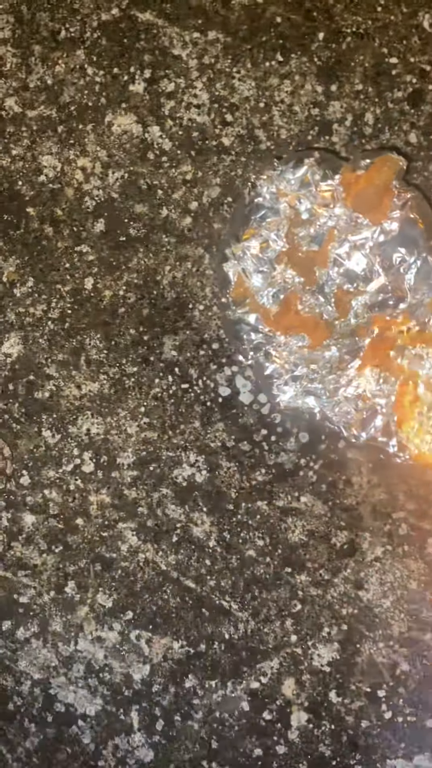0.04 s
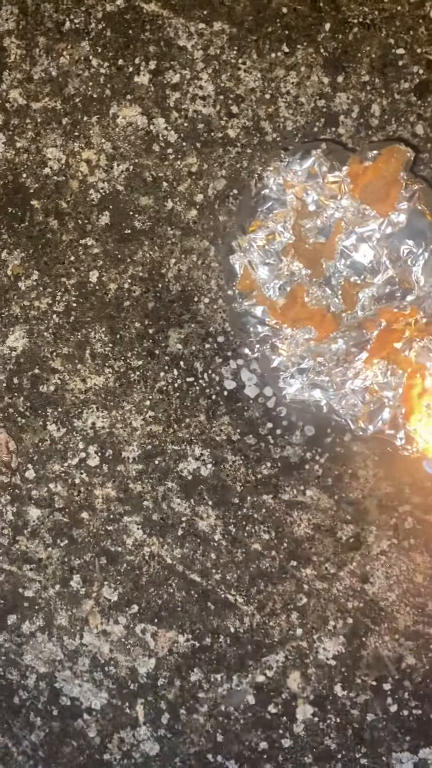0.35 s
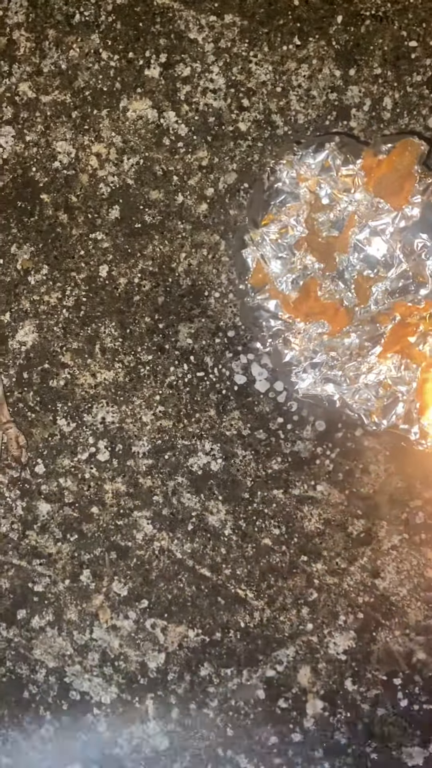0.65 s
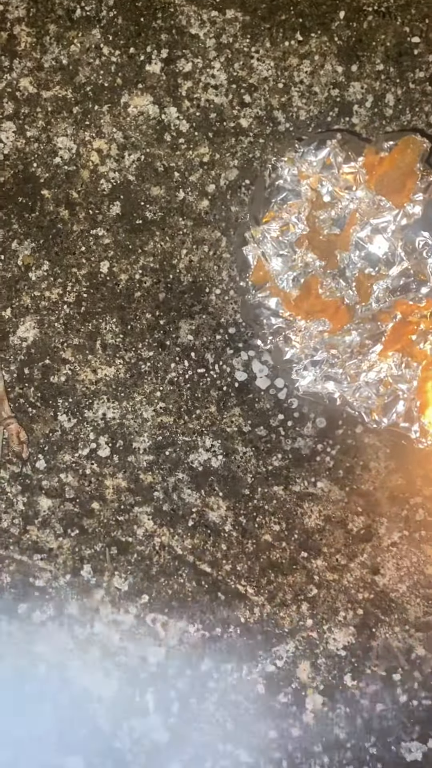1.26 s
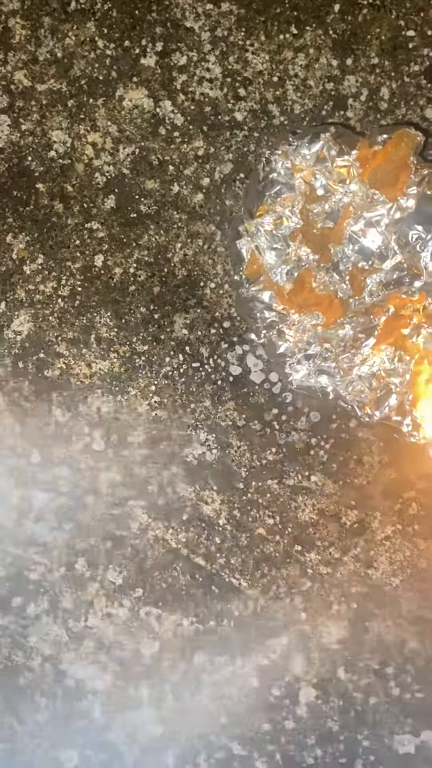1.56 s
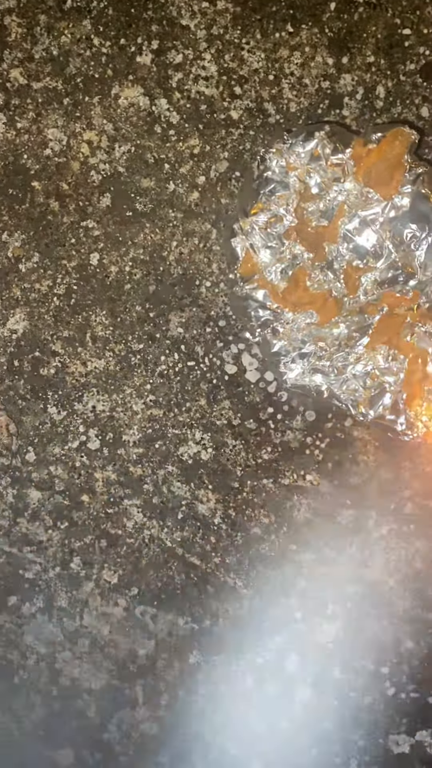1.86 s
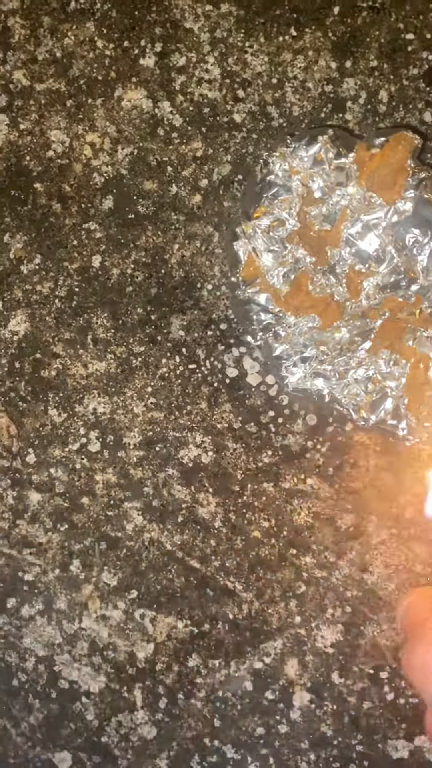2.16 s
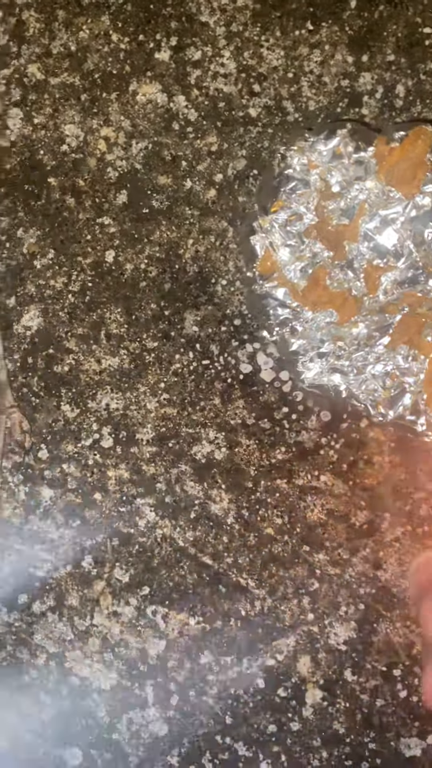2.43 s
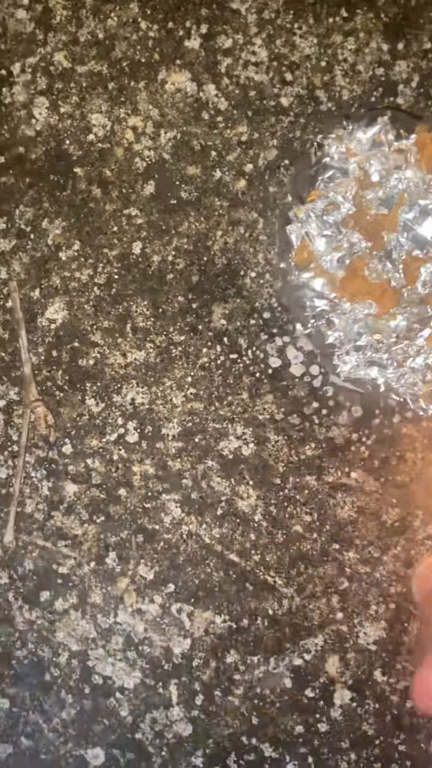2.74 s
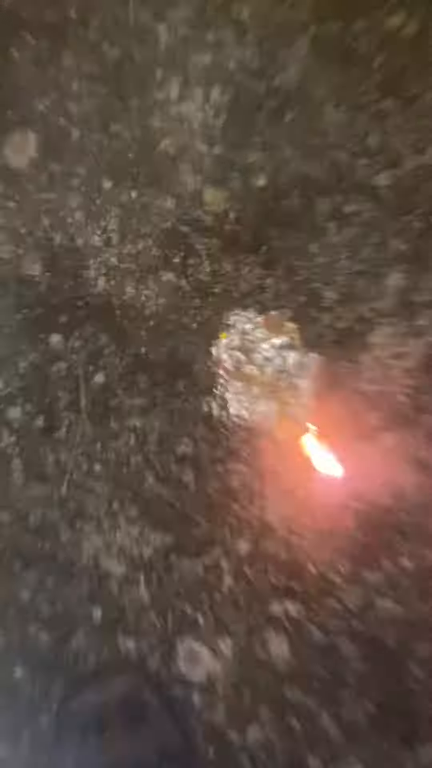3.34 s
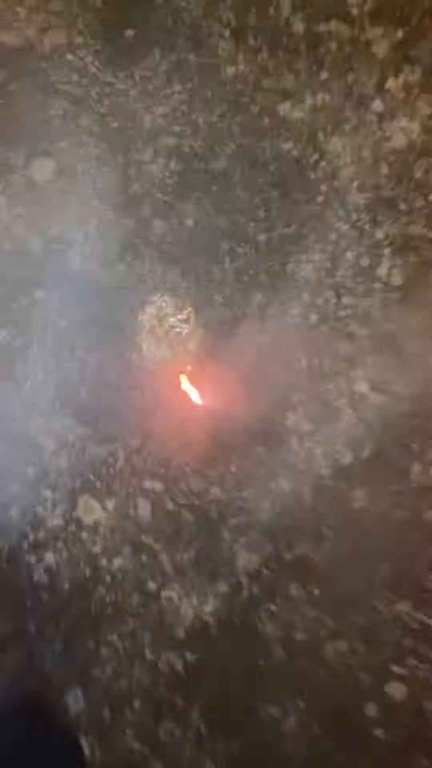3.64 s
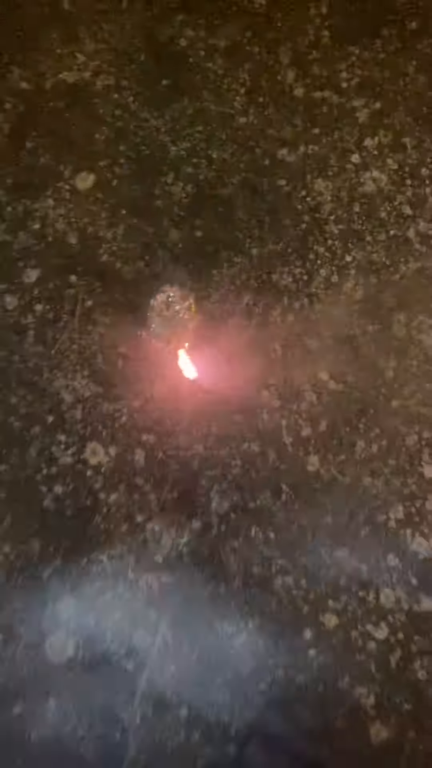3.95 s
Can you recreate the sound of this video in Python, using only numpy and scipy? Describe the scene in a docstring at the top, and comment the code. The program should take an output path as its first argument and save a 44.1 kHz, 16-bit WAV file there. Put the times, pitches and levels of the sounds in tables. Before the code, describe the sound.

Close by on outdoor paving, a burning smoke mixture puffs quietly and clicks, then crackles and builds to a strong hissing jet with a low roar and bright flares. Light wind rumbles on the microphone.

```python
"""A soft puff, then a sharp tick: a smoke mixture burns in crumpled foil, close by on stone paving.
It catches with a sputter, then the gas rushes out as a jet: a low roar, a broad hiss and a bright
sizzle when it flares. The hot foil rings briefly at each tick, and the paving gives short echoes that
slide as the microphone draws away. Underneath lie a low outdoor rumble, thin microphone hiss,
faint wind and a few buffets of air."""
import sys
import numpy as np
from scipy import signal
from scipy.fft import rfft, irfft
from scipy.io import wavfile
from scipy.ndimage import map_coordinates

SR = 44100
rng = np.random.default_rng(int(sys.argv[2]) if len(sys.argv) > 2 else 0)


def dump_mix(stems):
    """Bounce the given channels to the path in sys.argv[1] as a 16-bit WAV at rate SR."""
    frames = np.atleast_2d(stems).T  # one column per channel
    limited = np.clip(frames, -1, 1)  # hard clip at full scale
    pcm = np.round(limited * 32767).astype(np.int16)
    wavfile.write(sys.argv[1], SR, pcm)


N = 176400
T = np.arange(N) / SR
HZ = np.arange(N // 2 + 1) * SR / N


def from_db(db):
    """Decibels to gain."""
    return 10 ** (np.asarray(db) / 20)


def rms_one(x):
    """Scale to rms 1."""
    return x / np.sqrt(np.mean(x ** 2) + 1e-20)


def automation(rows):
    """One curve for each column after the time, sample by sample."""
    times, *columns = np.transpose(rows)
    return [np.interp(T, times, column) for column in columns]


def butter(x, order, hz, kind):
    """Butterworth low-, high- or band-pass."""
    return signal.sosfilt(signal.butter(order, hz, kind, fs=SR, output="sos"), x)


def eq_curve(points):
    """Gain at every frequency, rolling off 18 dB an octave beyond the end points."""
    hz, db = np.transpose(points)
    octaves = np.log2(HZ + 1e-3)
    outside = np.abs(octaves - np.clip(octaves, np.log2(hz[0]), np.log2(hz[-1])))
    return from_db(np.interp(octaves, np.log2(hz), db) - 18 * outside)


def drift(rate_hz):
    """A smooth random modulator of rms 1: noise low-passed at the rate."""
    step = 40   # samples per control point
    pole = np.exp(-2 * np.pi * rate_hz * step / SR)
    noise = rng.standard_normal(N // step + 2002)
    slow = signal.lfilter([1], [1, -2 * pole, pole * pole], noise)[2000:]
    return np.interp(np.arange(N) / step, np.arange(len(slow)), rms_one(slow))


def turbulence(spectrum, width, flutter_db, patchy_db, rate_hz):
    """Stereo noise of rms 1 whose bands waver together (flutter) and on their own (patchy)."""
    mid, side = rfft(rng.standard_normal((2, N)))
    spread = eq_curve(width)
    bins = (mid + spread * side * [[1], [-1]]) / np.sqrt(1 + spread ** 2) * eq_curve(spectrum)
    edges_hz = [0, 150, 400, 900, 1800, 3500, 6000, 9000, 12000, SR]
    together, out = flutter_db * drift(rate_hz), 0
    for low, high in zip(edges_hz, edges_hz[1:]):
        band = irfft(bins * ((HZ >= low) & (HZ < high)), N)
        out = out + band * from_db(together + patchy_db * drift(rate_hz))
    return rms_one(out)


# tone of the background bed, rumble and microphone hiss: (frequency [Hz], level [dB])
BED_EQ = [(25, -36), (40, -4), (60, 8), (100, -9.5), (160, -7), (300, -20.5), (600, -21.5), (1200, -28.5),
          (2000, -36), (4000, -38), (6000, -45), (8300, -44), (9500, -29.5), (11300, -21.5), (13500, -34),
          (15500, -46)]
# its stereo width: (frequency [Hz], side against mid [dB])
BED_WIDTH = [(50, -29), (250, -3), (800, 13), (3500, -5), (7000, -13), (14000, -13)]


def background():
    """A quiet bed: low outdoor rumble plus thin, high microphone hiss."""
    return from_db(-67.5) * turbulence(BED_EQ, BED_WIDTH, flutter_db=-0.1, patchy_db=1.0, rate_hz=26)


# tone of the wind: (frequency [Hz], level [dB])
WIND_EQ = [(22, -23), (45, 4), (80, -6.5), (130, -1.5), (220, -13), (450, -31)]
# its stereo width: (frequency [Hz], side against mid [dB])
WIND_WIDTH = [(30, -8), (300, -6.5)]
# its gusts: (time [s], level [dB])
WIND_LEVEL = [(1.45, -82), (1.95, -74), (2.04, -56), (2.12, -45.5), (2.25, -73), (2.7, -84), (3.1, -60),
              (3.35, -49.5), (3.52, -64), (3.65, -48.5), (4.0, -64)]


def wind():
    """Faint wind rumbles on the microphone."""
    db, = automation(WIND_LEVEL)
    return from_db(db) * turbulence(WIND_EQ, WIND_WIDTH, flutter_db=0.5, patchy_db=3.5, rate_hz=12.5)


# low bumps of air: (start [s], level [dB], pitch [Hz], attack [s])
BUFFETS = [(1.591, -48.5, 115, 0.01), (1.781, -40.5, 150, 0.0064), (2.016, -25, 200.1, 0.0035),
           (2.054, -40.5, 123.8, 0.034), (2.905, -32, 140.2, 0.006), (3.159, -29.5, 69.84, 0.017),
           (3.616, -39.5, 71.8, 0.021), (3.683, -44, 150, .0057)]


def buffets():
    """Lumps of air hit the microphone: a wavering low tone and a dull rush swell and die together."""
    out = np.zeros(N)
    for start, db, hz, attack in BUFFETS:
        age = np.maximum(T - start, 0) / attack
        swell = age ** 2 * np.exp(2 * (1 - age))
        pitch_hz = hz * np.exp(0.1167 * drift(61.3))
        tone = np.sin(2 * np.pi * np.cumsum(pitch_hz) / SR)
        rush = rms_one(butter(rng.standard_normal(N), 2, [hz * 0.5, hz * 1.78], "band"))
        out += from_db(db) * swell * (tone + from_db(-10) * rush)
    return out


# tone of the opening puff: (frequency [Hz], level [dB])
PUFF_EQ = [(100, 1.5), (200, -3), (400, 0.5), (700, -7), (1200, -15), (2000, -24), (3300, -33), (5000, -60)]
# its envelope: (time [s], level [dB])
PUFF_LEVEL = [(0.02, -77.5), (0.14, -64), (0.151, -56.5), (0.31, -56.5), (0.39, -63), (0.46, -61.5),
              (0.54, -75.5)]
# stereo spread of the puff and jet noise, narrowing to mono near 7.5 kHz:
# (frequency [Hz], side against mid [dB])
NOISE_WIDTH = [(40, -46), (200, -22), (1200, -9.5), (2000, -15), (2600, -2.5), (3500, -5), (5000, -11),
               (7500, -46), (15000, -8)]


def puff():
    """A soft, dull puff of flame and smoke before the jet."""
    db, = automation(PUFF_LEVEL)
    return from_db(db) * turbulence(PUFF_EQ, NOISE_WIDTH, flutter_db=0.9, patchy_db=0.7, rate_hz=58)


# spits of the mixture: (start [s], level before the filter [dB], low cut [Hz], high cut [Hz])
SPITS = [(0.2045, -46, 1300, 3300), (1.3905, -49, 4000, 13000), (1.43, -45.5, 3200, 13000),
         (1.4345, -50, 4000, 13000), (1.4768, -44, 4000, 13000)]


def spits(decay_s=0.0014):
    """Each spit is a very short burst of gas, dull or bright."""
    out = 0
    for start, db, low_hz, high_hz in SPITS:
        envelope = from_db(db) * (T >= start) * np.exp(-np.abs(T - start) / decay_s)
        burst = envelope * rng.standard_normal(N)
        out = out + butter(burst + 1e-18, 2, [low_hz, high_hz], "band")
    return out


# sharp ticks of the foil: (start [s], gain [dB])
TICKS = [(0.5015, -63), (0.5094, -34.5), (1.505, -36.5)]
# the foil's ringing modes: (frequency [Hz], level [dB], time to fall 60 dB [s])
FOIL_MODES = [(4750, -34, .02), (6810, -5.5, 0.034), (8430, -0.5, 0.024), (9330, -5, 0.017),
              (10160, 0, 0.012), (10700, -4.5, 0.014), (12400, 0.5, 0.019), (13750, -2, .012)]


def foil_ticks(burst_decay_s=0.0011):
    """The hot foil ticks: a bright snap, a faint thud and a short, high ring."""
    out, t = np.zeros(N + SR), T[:SR // 10]
    for start, db in TICKS:
        ring = 0
        for hz, mode_db, t60 in FOIL_MODES:
            gain = from_db(mode_db + rng.normal(0, 1)) * rng.choice([-1, 1])
            ring = ring + gain * np.sin(2 * np.pi * hz * t) * from_db(-60 * t / t60)
        burst = rng.standard_normal(len(t)) * np.exp(-t / burst_decay_s)
        snap = from_db(-5.5) * butter(burst, 4, 8300, "high")
        thud = from_db(-29.5) * butter(burst, 2, 3500, "low")
        i = int(start * SR)
        out[i:i + len(t)] += from_db(db) * (ring + snap + thud)
    return out[:N]


def delayed(x, ms):
    """Both channels through a sliding delay."""
    return np.array([map_coordinates(channel, [(T - ms / 1000) * SR], order=3) for channel in x])


def notch(x, hz, depth_db, width_hz, block=256):
    """A swept notch, stepped block by block; a negative depth boosts."""
    out, state = np.zeros_like(x), np.zeros((2, 2))
    damping = np.pi * width_hz / SR
    for i in range(0, N, block):
        tuning = -2 * np.cos(2 * np.pi * hz[i] / SR)
        floor = damping * from_db(-depth_db[i])
        b, a = [1 + floor, tuning, 1 - floor], [1 + damping, tuning, 1 - damping]
        out[:, i:i + block], state = signal.lfilter(b, a, x[:, i:i + block], zi=state)
    return out


# first echo off the paving, shifting as flame and microphone move: (time [s], delay [ms])
NEAR_ECHO = [(1.7, 0.3), (2.1, 0.28), (2.45, .319), (2.9, 0.31), (3.25, 0.343), (3.6, 0.29)]
# a later echo, sliding as the microphone draws away: (time [s], delay [ms], gain [ratio])
FAR_ECHO = [(2.5, 1.03, 0.19), (2.9, 0.78, 0.084), (3.45, 1.04, 0.12), (4.0, 1.22, .16)]
# notches where direct sound and echoes cancel:
# (time [s], low notch [Hz], depth [dB], mid notch [Hz], depth [dB], high notch [Hz], depth [dB])
NOTCHES = [(1.6, 1570, 6.5, 4430, 16, 10000, 9), (1.9, 1640, 7, 4600, 6, 11100, 5),
           (2.1, 1790, 19, 5500, 2.5, 10900, 5.5), (2.33, 1770, 10, 4500, -3, 11600, 8),
           (2.67, 1680, 4, 4300, 1, 11700, 11), (2.87, 1690, 15, 5250, 1, 11500, 4),
           (3.1, 1490, 10.5, 4700, -1, 11400, 9), (3.44, 1480, 3, 4530, 7, 10000, 1),
           (4.0, 1410, 6, 4730, 4, 10900, -2)]
# their widths: (low [Hz], mid [Hz], high [Hz])
NOTCH_WIDTHS = [580, 1170, 1100]


def paving(x):
    """Bounces off the stone phase the sound: two short, sliding echoes and three moving notches."""
    near_ms, = automation(NEAR_ECHO)
    far_ms, far_gain = automation(FAR_ECHO)
    x = x + 0.2 * delayed(x, near_ms) + far_gain * delayed(x, far_ms)
    sweeps = automation(NOTCHES)
    for hz, depth_db, width_hz in zip(sweeps[::2], sweeps[1::2], NOTCH_WIDTHS):
        x = notch(x, hz, depth_db, width_hz)
    return x


# tone of the crackle: (frequency [Hz], level [dB])
CRACKLE_EQ = [(1200, -2), (3400, -1), (9500, 0), (15000, -7)]


def crackle(per_second, spread_db):
    """Tiny bursts of burning grains, of very uneven size; rms 1."""
    sizes = from_db(spread_db * np.minimum(rng.exponential(1, N), 4)) * rng.choice([-1, 1], N)
    clicks = sizes * (rng.random(N) < per_second / SR)
    return rms_one(irfft(rfft(clicks) * eq_curve(CRACKLE_EQ), N))


# fader moves of the jet, ahead of its trims: (time [s], roar [dB], hiss [dB], sizzle [dB])
JET_FADERS = [(1.285, -95, -92, -99), (1.305, -68.5, -55, -64), (1.36, -68.5, -64, -86),
              (1.455, -74, -65, -73), (1.53, -56.5, -50.5, -59), (1.61, -51.5, -49, -64),
              (1.7, -53.5, -48.5, -67), (1.78, -45, -44, -53), (1.84, -50.5, -47.5, -61.5),
              (1.91, -47, -46.5, -61), (1.98, -49.5, -47, -52.5), (2.04, -43.5, -46.5, -41.5),
              (2.1, -45, -52, -40), (2.17, -44, -48, -48), (2.28, -45, -46.5, -54.5),
              (2.43, -48.5, -49.5, -62), (2.48, -40.5, -41.5, -60), (2.58, -44, -43, -48.5),
              (2.78, -42.5, -43.5, -49.5), (2.88, -41, -41, -38), (3.1, -42, -39, -40),
              (3.26, -46.5, -42, -44.5), (3.39, -44.5, -41.5, -54), (3.52, -50.5, -44, -62),
              (3.7, -45.5, -44.5, -59), (3.78, -50.5, -46.5, -66), (4.0, -50, -45.5, -53.5)]
# tones of the low roar, broad hiss and bright sizzle: (frequency [Hz], level [dB])
ROAR_EQ = [(25, -25), (60, 0), (120, -1), (250, -1.5), (500, -1), (800, -6), (1200, -7.5), (1600, -7.5),
           (3000, -15)]
HISS_EQ = [(600, -6.5), (1300, -4), (2150, 2), (2720, -3), (3050, 2), (3600, 1.5), (4500, 1), (5200, 1.5),
           (8000, -0.5), (10000, -7), (12200, 0), (13300, -9), (15500, -11.5)]
SIZZLE_EQ = [(4000, -18), (7000, -4), (8400, -1), (9500, 3), (11300, -0.5), (12600, -4.5), (14200, -3),
             (15700, -10.5)]


def jet(sputter_end_s=1.53, roar_trim_db=-1.5, output_trim_db=1.23):
    """Gas rushes from the burning mixture over the paving, crackling most while it catches."""
    roar_db, hiss_db, sizzle_db = automation(JET_FADERS)
    roar = turbulence(ROAR_EQ, NOISE_WIDTH, flutter_db=1.8, patchy_db=1.3, rate_hz=95)
    hiss = turbulence(HISS_EQ, NOISE_WIDTH, flutter_db=0.84, patchy_db=0.82, rate_hz=51)
    grains_db = np.where(T < sputter_end_s, -2.5, -19.5)   # against the hiss
    grains = from_db(grains_db) * crackle(per_second=650, spread_db=5.5)
    sizzle = turbulence(SIZZLE_EQ, NOISE_WIDTH, flutter_db=0.2, patchy_db=2.06, rate_hz=25)
    flame = (from_db(roar_db + roar_trim_db) * roar
             + from_db(hiss_db) * (hiss + grains)
             + from_db(sizzle_db) * sizzle)
    return from_db(output_trim_db) * paving(flame)


def scene():
    """The mixture burns in its foil over a quiet background and faint wind."""
    return background() + wind() + jet() + puff() + spits() + foil_ticks() + buffets()


# phase between the two microphone ports: (frequency [Hz], lead of the left channel [rad])
PORT_PHASE = [(0, 0), (300, -.15), (700, -.65), (1100, -.35), (1950, -.15), (2350, -.8), (2700, -3.1),
              (3100, -4.4), (3900, -5.6), (5100, -6.25), (5600, -5.9), (6500, -3.7), (7000, -3.16),
              (8000, -3.1), (8600, -1.9), (9800, -.05), (11000, .05), (12000, 1.6), (12900, 3.1),
              (14200, 3.2), (15000, 4.4), (15600, 6.1)]


def record(dry, cutoff_hz=15900):
    """The two ports shift the phase between the channels; a steep low-pass cuts the top."""
    hz = np.arange(N + 1) * SR / (2 * N)
    phase = np.interp(hz, *np.transpose(PORT_PHASE))
    shift = np.exp(0.5j * phase * [[1], [-1]])   # half to each channel, in opposite directions
    stereo = irfft(rfft(dry, 2 * N) * shift, 2 * N)[:, :N]
    return signal.sosfilt(signal.ellip(12, 0.1, 80, cutoff_hz, fs=SR, output="sos"), stereo)


dry = scene()
out = record(dry)
dump_mix(out)
```